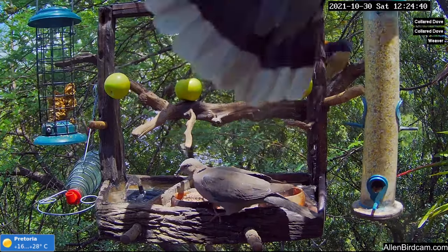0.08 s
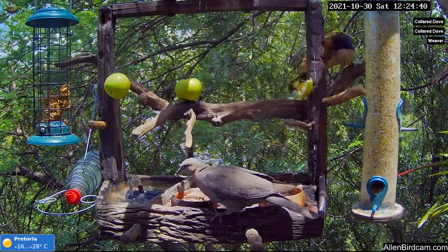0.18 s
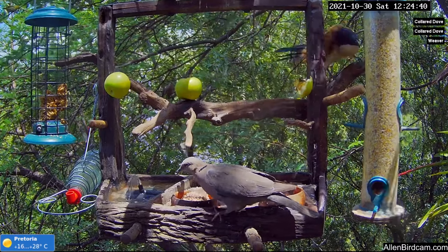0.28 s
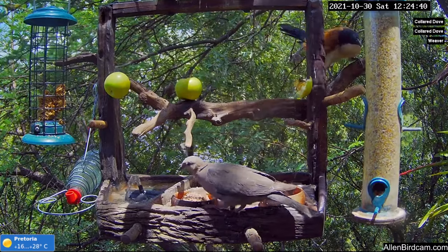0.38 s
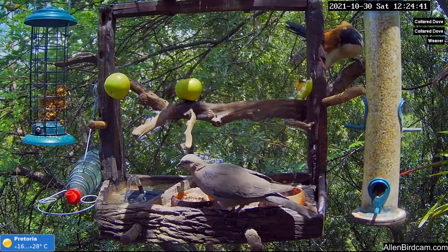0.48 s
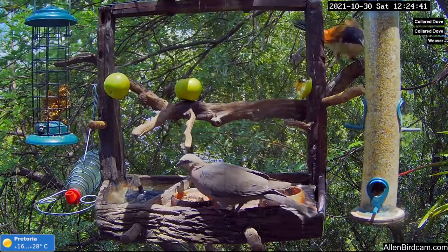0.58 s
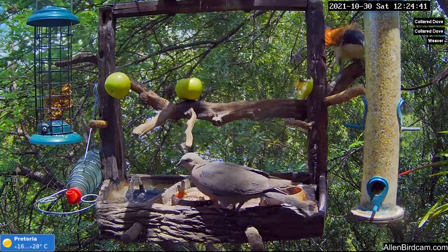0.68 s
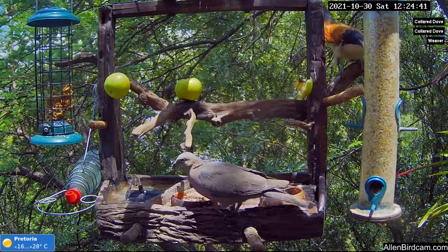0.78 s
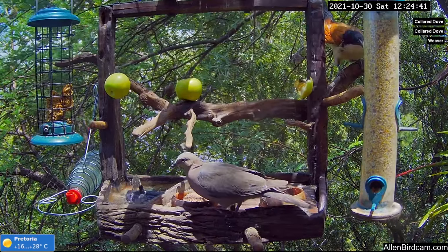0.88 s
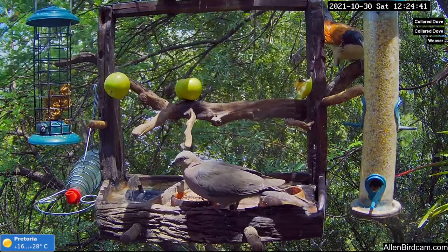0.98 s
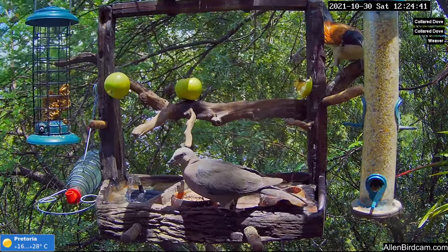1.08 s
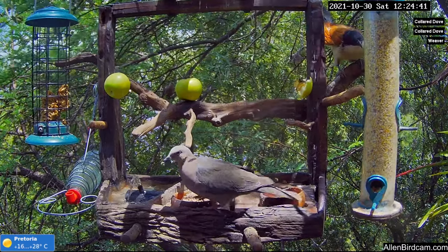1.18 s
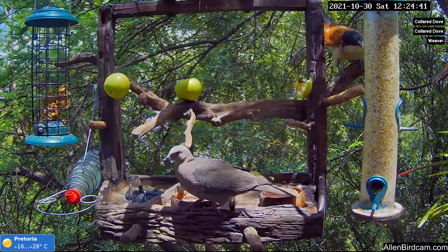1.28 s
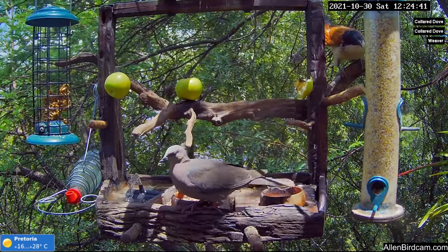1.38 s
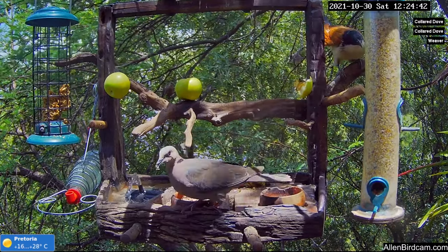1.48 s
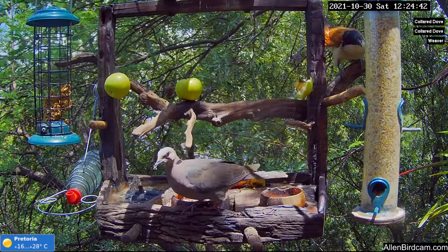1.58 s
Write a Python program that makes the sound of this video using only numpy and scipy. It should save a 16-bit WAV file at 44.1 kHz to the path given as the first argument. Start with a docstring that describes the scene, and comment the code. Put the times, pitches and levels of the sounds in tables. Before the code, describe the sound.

Close wingbeats of a dove taking off, with small birds chirping and faint pecking.

```python
"""Feathers snap and swish as a dove kicks off a garden feeder and flaps right past the microphone.
Two wingbeats shove air into the capsule and overload it, and the wake rumbles away.
Small birds whistle and chirp with the syrinx, their calls scattered by the trees.
Beaks tick on seed and knock on the wooden tray over a dull outdoor background."""
import sys
import numpy as np
from scipy import signal
from scipy.fft import rfft, irfft, next_fast_len
from scipy.io import wavfile
from scipy.ndimage import map_coordinates

SR = 44100
rng = np.random.default_rng(int(sys.argv[2]) if len(sys.argv) > 2 else 0)


def int16_out(signal):
    """Quantize to a 16-bit WAV file."""
    q = np.round(np.clip(np.atleast_2d(signal).T, -1, 1) * 32767)
    wavfile.write(sys.argv[1], SR, q.astype(np.int16))


N = 70560


def amp(db):
    """Decibels to gain."""
    return 10 ** (np.asarray(db) / 20)


def unit(x):
    """Scale to rms 1."""
    return x / np.sqrt(np.mean(x ** 2) + 1e-20)


def clock():
    """Sample times [s]."""
    return np.arange(N) / SR


def along(points, hz):
    """Interpolate (frequency [Hz], value) points on a log frequency axis."""
    f, v = np.transpose(points)
    return np.interp(np.log(hz + 1), np.log(f + 1), v)


def curves(rows):
    """Per-sample curve for each column after the time."""
    s, *cols = np.transpose(rows)
    return [np.interp(clock(), s, c) for c in cols]


def wobble(knots_per_s):
    """Smooth random curve."""
    return map_coordinates(rng.standard_normal(N), [clock() * knots_per_s], mode="wrap")


def filtered(x, response):
    """Apply the gain response(hz)."""
    m = next_fast_len(N + SR // 2)
    return irfft(rfft(x, m) * response(np.fft.rfftfreq(m, 1 / SR)), m)[:N]


def noise(colour, shade=lambda hz: 1):
    """Noise of rms 1, shaped by (frequency [Hz], level [dB]) points and the gain shade(hz)."""
    return unit(filtered(rng.standard_normal(N), lambda hz: amp(along(colour, hz)) * shade(hz)))


def burst(start_s, t60_s):
    """Envelope: sudden start, exponential decay."""
    t = clock() - start_s
    return np.clip(t / 0.00036, 0, 1) * amp(-60 * np.abs(t) / t60_s)


def swell(peak_s, rise_s, fall_s):
    """Envelope: rise and fall about a peak."""
    t = clock() - peak_s
    return np.exp(-np.abs(t / np.where(t < 0, rise_s, fall_s)) ** 1.11)


def glide(rows, rough):
    """Pitch [Hz], phase [rad] and envelope of a gliding tone; rough is relative pitch jitter."""
    hz, db = curves(rows)
    hz = hz * (1 + rough * wobble(900))
    gate = np.clip(np.minimum(clock() - rows[0][0], rows[-1][0] - clock()) / 0.0061, 0, 1)
    return hz, 2 * np.pi * np.cumsum(hz) / SR, np.sqrt(2) * gate * amp(db)


def ringing(force, modes, t60_s):
    """Narrow resonances shaken by noise under the force envelope."""
    t = clock()[:SR // 4]
    decay = amp(-60 * t / t60_s)
    tones = sum(amp(db) * np.sin(2 * np.pi * hz * t) for hz, db in modes)
    ring = tones * decay * np.sqrt(2) / np.linalg.norm(decay)
    return signal.fftconvolve(force * rng.standard_normal(N), ring)[:N]


def among_trees(x, wet_db):
    """Direct sound plus scatter from trunks and leaves."""
    # scatter decay (frequency [Hz], t60 [s])
    decay_times = [(200, 0.062), (3000, 0.22), (7000, 0.14)]
    hz, t, spectra = signal.stft(rng.standard_normal(SR // 2), SR, nperseg=256)
    decay = amp(-60 * t / along(decay_times, hz)[:, None])
    build_up = 1 - np.exp(-t / 0.0096)
    tail = signal.istft(spectra * decay * build_up, SR, nperseg=256)[1]
    return x + amp(wet_db) * signal.fftconvolve(x, tail / np.linalg.norm(tail))[:N]


def garden(drone_hz=1603, drone_db=-81):
    """Dull, slightly swaying outdoor background with one faint steady tone."""
    # background spectrum (frequency [Hz], level [dB])
    colour = [(35, -8.5), (90, 10), (150, -3), (270, 0), (450, -8), (750, -10.5), (1300, -22),
              (1700, -27.5), (2300, -43), (3500, -44.5), (7000, -46), (10000, -51), (14500, -54)]
    background = amp(-54.5 + 1.2 * wobble(8.56)) * noise(colour)
    return background + amp(drone_db) * np.sin(2 * np.pi * drone_hz * clock())


def wing_air(skirt=1.5, leak_hz=8):
    """Close wingbeats swing the pressure both ways; eddies rumble. The capsule leaks the slowest part."""
    # air shoves (time [s], first peak [dB], second lobe re first [dB],
    # first width [s], second width [s], direction [+-1])
    pushes = [(.2236, 1.5, -3.5, .0047, .0056, 1), (.3332, 2.5, 3, .0052, .0078, -1)]
    # eddy envelope (time [s], level [dB])
    wake = [(0, -23.5), (.1, -23.5), (.17, -21), (.31, -21.5), (.38, -13.5), (.47, -22.5), (.6, -32),
            (.72, -33.5), (.85, -29.5), (.93, -39), (1.0, -33.5), (1.15, -34.5), (1.3, -41.5), (1.6, -36.5)]
    # eddy spectrum (frequency [Hz], level [dB])
    wake_colour = [(8, 7), (22, 0.5), (45, -12), (75, -12.5), (105, -20), (150, -34), (300, -32),
                   (900, -80)]
    pressure = amp(curves(wake)[0]) * noise(wake_colour)
    for s, db, rebound_db, first_s, second_s, direction in pushes:
        t = clock() - s
        u = t / np.where(t < 0, first_s, second_s)
        swing = -u / (1 + u * u / (2 * skirt + 1)) ** (skirt + 1)
        pressure += direction * amp(db + rebound_db * (t > 0)) * swing / swing.max()
    return filtered(pressure, lambda hz: 1j * hz / (leak_hz + 1j * hz))


def feathers(rustle_hiss_db=-10, flutter_db=1):
    """Wing strokes whoosh and hiss with a flutter; quills snap; one whirr falls in pitch."""
    # feather rustle (time [s], level [dB])
    rustle_levels = [(0, -43), (.13, -38), (.2, -46), (.29, -46), (.37, -49), (.45, -51), (.53, -62),
                     (.65, -73), (.8, -69.5), (1.6, -102.5)]
    # wing strokes (time [s], rise [s], fall [s], whoosh [dB], hiss [dB], hiss tilt [dB/octave])
    strokes = [(0.014, 0.0051, 0.0075, -26.5, -33, 5), (0.062, 0.003, 0.011, -32, -45, -14),
               (0.1, 0.0091, 0.01, -29.5, -46.5, 3), (0.176, 0.0048, 0.0036, -28, -36, -5),
               (0.229, 0.025, 0.015, -35.5, -38.5, -4.5), (0.333, 0.009, 0.012, -30.5, -42.5, 3.5),
               (0.423, 0.0028, 0.012, -36.5, -41.5, 4)]
    # quill snaps (time [s], peak [dB], t60 [s], upper edge [Hz])
    quills = [(.0085, -22, .016, 14000), (0.0111, -31, .02, 13000), (.017, -30.5, .018, 8500),
              (0.0829, -26.5, .012, 8000), (0.16, -36, .018, 4500), (0.176, -33, .012, 4500)]
    # spectra (frequency [Hz], level [dB])
    whoosh_colour = [(60, -6.5), (170, 1.5), (300, 5), (600, -1.5), (1000, -7), (1600, -14), (2600, -40),
                     (6000, -51)]
    hiss_colour = [(500, -6), (1500, 1), (3000, 8), (5500, 13.5), (8000, 10), (9500, 2.5), (12000, -8),
                   (14500, -39)]
    snap_colour = [(300, 27), (1000, 7), (3500, 13.5), (8500, 13.5), (13000, 5.5), (14500, -48)]
    # wing whirr (time [s], pitch [Hz], level [dB])
    whirr = [(.195, 1041, -35), (.21, 982, -50), (.219, 958, -35.5), (.225, 716, -28.5), (.23, 630, -31),
             (.238, 510, -69)]
    rustle = amp(curves(rustle_levels)[0])
    whoosh_power = rustle ** 2
    hiss = amp(rustle_hiss_db) * rustle * noise(hiss_colour)
    for s, rise_s, fall_s, whoosh_db, hiss_db, tilt in strokes:
        stroke = swell(s, rise_s, fall_s)
        whoosh_power += (amp(whoosh_db) * stroke) ** 2
        hiss += amp(hiss_db) * stroke * noise(hiss_colour, lambda hz: amp(tilt * np.log2(hz + 1)))
    flutter = unit(amp(flutter_db * wobble(500)))
    swish = flutter * (np.sqrt(whoosh_power) * noise(whoosh_colour) + hiss)
    snaps = sum(amp(db) * burst(s, t60_s) * noise(snap_colour, lambda hz: 1 / (1 + (hz / edge_hz) ** 6))
                for s, db, t60_s, edge_hz in quills)
    _, phase, level = glide(whirr, rough=0.12)
    return among_trees(swish + snaps + level * np.sin(phase), wet_db=-17)


def perch(kick_s=.0105, t60_s=0.042):
    """The perch rings briefly as the dove kicks off."""
    # perch modes (frequency [Hz], level [dB])
    modes = [(400, -30), (590, -19), (910, -25), (1270, -33.5), (1620, -33)]
    t = clock() - kick_s
    return burst(kick_s, t60_s) * sum(amp(db) * np.sin(2 * np.pi * hz * t) for hz, db in modes)


def whistle(rows, rough, buzz=0, buzz_hz=270):
    """Pure syrinx tone; buzz is the depth of its amplitude pulsing."""
    _, phase, level = glide(rows, rough)
    pulsing = 1 + buzz * np.sin(2 * np.pi * buzz_hz * clock() + wobble(buzz_hz / 2))
    return level * np.sin(phase) * pulsing


def call(rows, partials_db, rough, rasp_db):
    """Syrinx harmonics shaped by the throat, with a noisy rasp."""
    # throat and beak response (frequency [Hz], gain [dB])
    throat = [(1100, -29), (1550, -13.5), (2200, -4), (3200, 7), (4750, 1.5), (5200, -14), (6600, -40),
              (10000, -42.5)]
    # rasp spectrum (frequency [Hz], level [dB])
    rasp = [(1400, -16), (1650, 5), (1950, -5.5), (2300, -4), (4750, 1), (5150, -12.5), (7300, -44),
            (10000, -36), (12500, -51)]
    hz, phase, level = glide(rows, rough)
    gains = np.array([amp(db + along(throat, k * hz)) for k, db in enumerate(partials_db, 1)])
    tone = sum(g * np.sin(k * phase) for k, g in enumerate(gains, 1)) / np.linalg.norm(gains, axis=0)
    return level * (tone + amp(rasp_db) * noise(rasp))


def birds():
    """Two falling whistles, a falling buzz with overtone, a two-part chirp, a harsh chip, a far note."""
    # syrinx contours (time [s], pitch [Hz], level [dB])
    first_fall = [(.126, 5250, -61), (.13, 5260, -41), (.138, 5170, -51), (.145, 5060, -34),
                  (.163, 4860, -37.5), (.172, 4670, -43.5), (.186, 4670, -44), (.204, 4040, -48)]
    second_fall = [(.184, 5600, -49), (.196, 5050, -57), (.206, 4565, -44), (.218, 4140, -36.5),
                   (.228, 3850, -44.5), (.243, 3690, -34)]
    buzz_note = [(.238, 3780, -30), (.245, 3420, -37), (.253, 3175, -41.5), (.26, 2923, -37.5),
                 (.28, 2583, -47.5), (.29, 2004, -60), (.302, 1744, -54), (.316, 1680, -51)]
    buzz_overtone = [(.252, 6150, -53), (.262, 5700, -47), (.281, 4850, -50), (.298, 3900, -52)]  # about an octave above
    chirp_onset = [(.794, 3680, -58), (.806, 3760, -75), (.814, 4420, -63), (.826, 4900, -61)]
    chirp_arch = [(.8, 1950, -57), (.813, 2410, -59), (.822, 2770, -41), (.834, 2946, -36),
                  (.845, 3010, -42), (.858, 2838, -39), (.868, 2344, -55.5), (.877, 1970, -70)]
    chirp_dip = [(.873, 1958, -74), (.88, 1822, -57.5), (.892, 1612, -50), (.905, 1314, -53),
                 (.917, 1326, -54.5), (.927, 1463, -50), (.937, 1970, -60)]
    chip_note = [(1.091, 1138, -63), (1.099, 1091, -44.5), (1.106, 1105, -38.5), (1.112, 1463, -34.5),
                 (1.116, 1815, -39.5), (1.12, 1476, -34), (1.124, 1120, -38.5), (1.135, 1172, -43),
                 (1.144, 1290, -44.5), (1.151, 1078, -46.5), (1.162, 1060, -58)]
    far_arch = [(1.506, 3180, -85), (1.552, 3630, -92), (1.57, 3120, -79)]
    # narrow fixed resonances that ring on after the chip (frequency [Hz], level [dB])
    resonances = [(5330, -35), (6060, -42), (6595, -45), (8457, -45), (9216, -57)]
    falling = whistle(first_fall, rough=.005) + whistle(second_fall, rough=.008)
    buzzing = sum(whistle(rows, rough=.028, buzz=0.37) for rows in (buzz_note, buzz_overtone))
    chirp = whistle(chirp_onset, rough=.028)
    chirp += call(chirp_arch, partials_db=[0], rough=0.0032, rasp_db=-32.5)
    chirp += call(chirp_dip, partials_db=[3, 0], rough=0.013, rasp_db=-20.5)
    far = whistle(far_arch, rough=.006)
    chip = call(chip_note, partials_db=[9, 13, 7, -4], rough=.028, rasp_db=-9)
    _, _, chip_envelope = glide(chip_note, rough=0)
    chip += ringing(chip_envelope, resonances, t60_s=.11)
    return among_trees(falling + buzzing + chirp + far, wet_db=-15) + among_trees(chip, wet_db=-19.5)


def tone_pulses(rows, waver_rad):
    """Brief tones that swell and fade symmetrically, with wavering phase."""
    return sum(amp(db) * swell(s, width_s, width_s) * np.sin(2 * np.pi * hz * (clock() - s) + waver_rad)
               for s, hz, db, width_s in rows)


def feeding():
    """Knocks and thuds on the wooden feeder, short pips, and ringing pecks that crack seed husks."""
    # wood knocks; pecks and pips (time [s], frequency [Hz], peak [dB], half-width [s])
    knocks = [(.148, 61.5, -20.5, 0.02), (.263, 44.8, -13.5, 0.0072), (.482, 54.7, -26.5, 0.036),
              (.55, 53.4, -27, 0.043), (0.581, 327, -38.5, 0.0043), (0.668, 287, -40, 0.011),
              (.968, 750, -43, 0.0038), (.969, 70, -33, 0.021), (1.007, 69.7, -38, 0.063),
              (1.226, 290, -41.5, 0.0063), (1.302, 1230, -57, 0.0036)]
    pecks = [(.67, 7100, -48.5, 0.0015), (.769, 2650, -56, 0.0026), (1.089, 3010, -45.5, 0.0028),
             (1.232, 5360, -46, 0.0011), (1.248, 2320, -53.5, 0.0029), (1.296, 4410, -57.5, 0.0018),
             (1.453, 5500, -57.5, 0.0012)]
    # husk cracks (time [s], peak [dB])
    husks = [(0.562, -42), (.793, -55.5), (0.934, -59), (1.23, -58), (1.244, -58), (1.392, -51),
             (1.453, -65), (1.502, -51.5), (1.513, -63.5)]
    # crack spectrum; modes each crack rings (frequency [Hz], level [dB])
    crack_colour = [(1000, 2.5), (3500, -23), (5200, 10.5), (7200, -3.5), (8200, -6), (13000, -16)]
    crack_modes = [(4320, -13), (5270, -13), (6550, -16), (7080, -12), (8650, -18)]
    pips = tone_pulses(pecks, waver_rad=.4 * wobble(600))
    force = sum(amp(db) * burst(s, t60_s=0.0054) for s, db in husks)
    cracks = force * noise(crack_colour) + ringing(force, crack_modes, t60_s=.1)
    return among_trees(pips + cracks, wet_db=-12) + tone_pulses(knocks, waver_rad=.5 * wobble(58.6))


def wing_thump():
    """The last close wingbeat lands with a short hollow thump."""
    # thump spectrum (frequency [Hz], level [dB])
    colour = [(200, -20), (340, 0), (480, -2), (750, -12), (1200, -35)]
    return amp(-28) * swell(peak_s=.331, rise_s=.009, fall_s=.009) * noise(colour)


def scene():
    """All sources at one microphone."""
    dove = wing_air() + feathers() + wing_thump() + perch()
    return (dove + birds() + feeding() + garden())[None]


def record(dry):
    """The input clips flat on the strongest push, then is band-limited."""
    clip_level, top_hz = .95, 14500
    clipped = np.clip(dry[0], -clip_level, clip_level)
    return filtered(clipped, lambda hz: 1 / (1 + (hz / top_hz) ** 40))[None]


dry = scene()
out = record(dry)
int16_out(out)
```